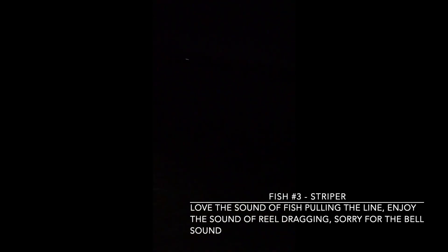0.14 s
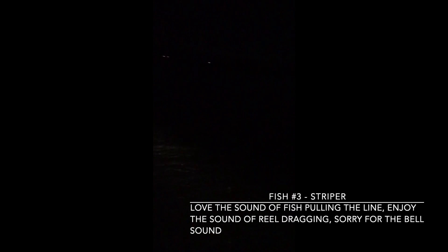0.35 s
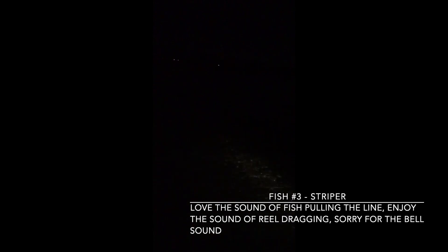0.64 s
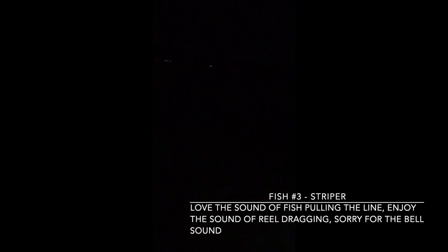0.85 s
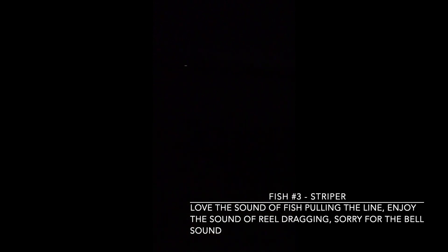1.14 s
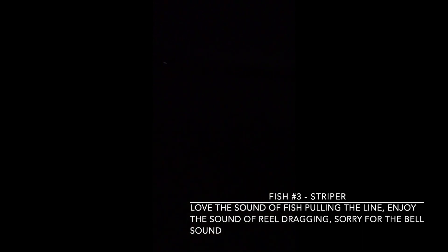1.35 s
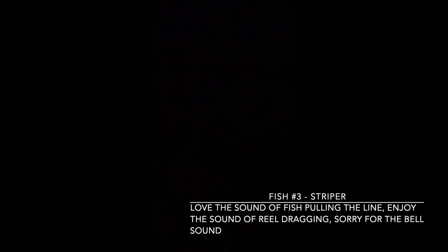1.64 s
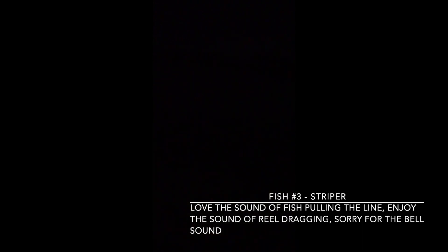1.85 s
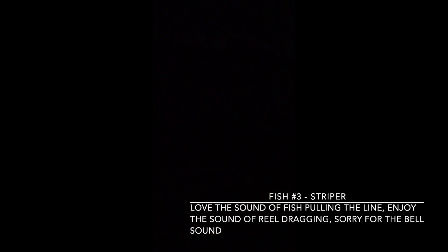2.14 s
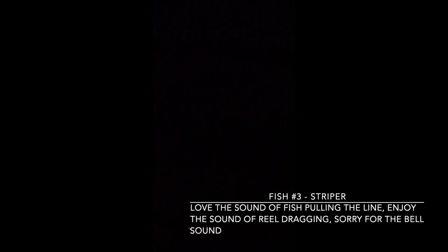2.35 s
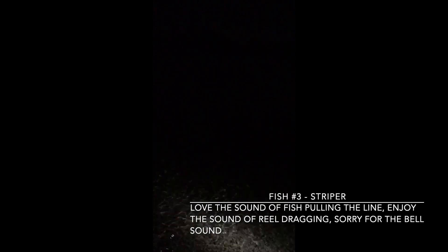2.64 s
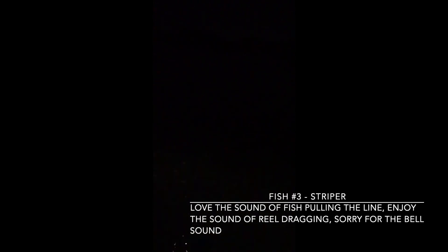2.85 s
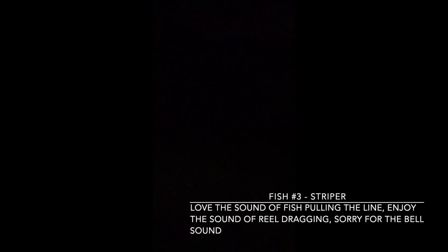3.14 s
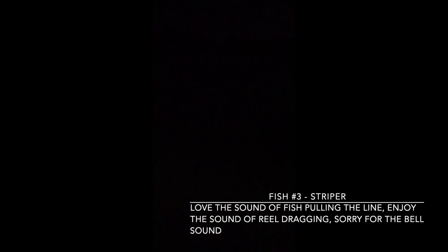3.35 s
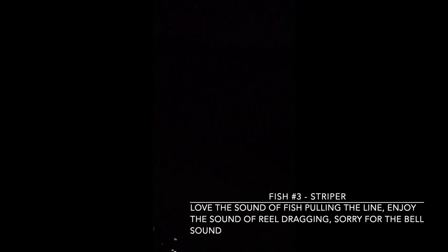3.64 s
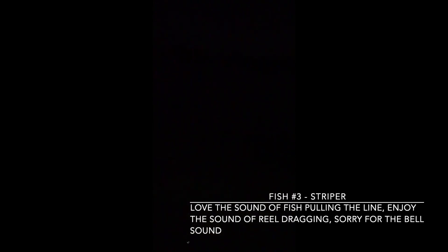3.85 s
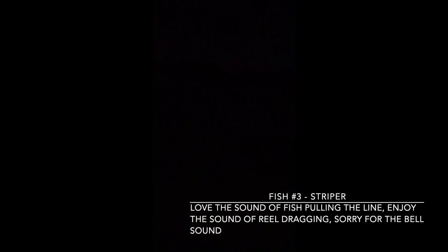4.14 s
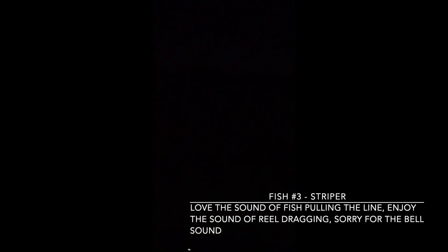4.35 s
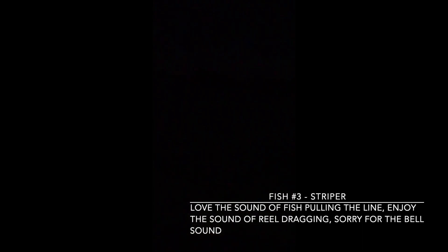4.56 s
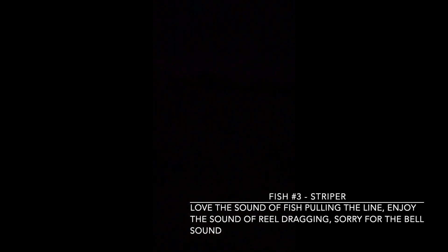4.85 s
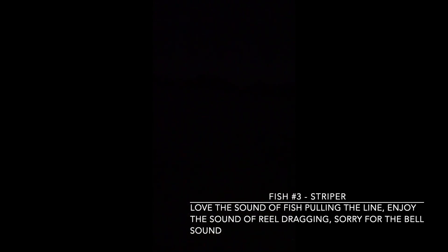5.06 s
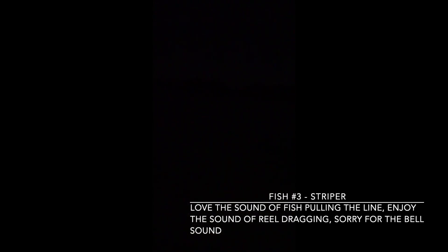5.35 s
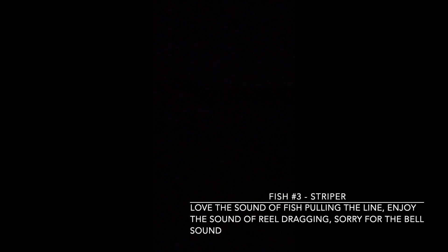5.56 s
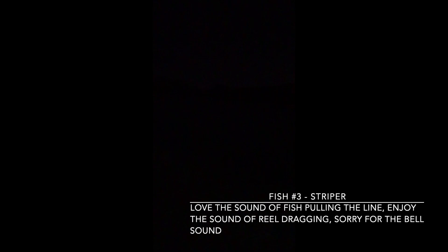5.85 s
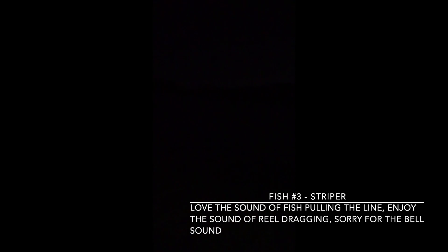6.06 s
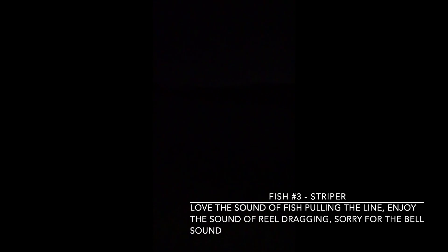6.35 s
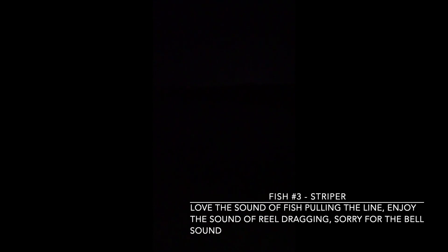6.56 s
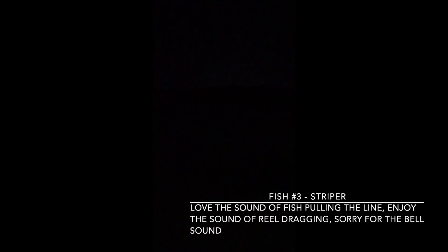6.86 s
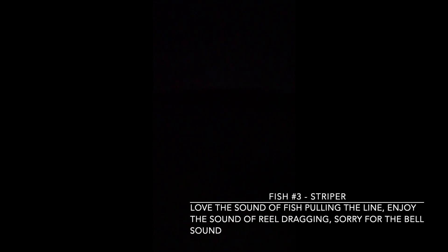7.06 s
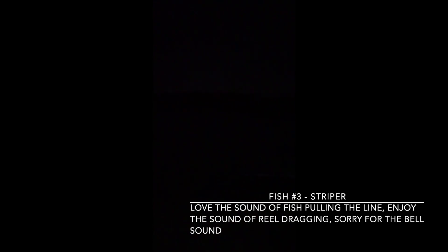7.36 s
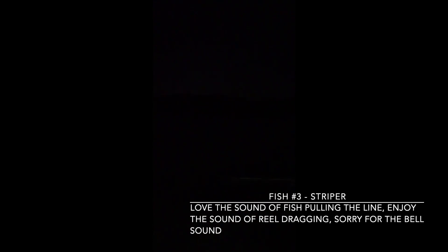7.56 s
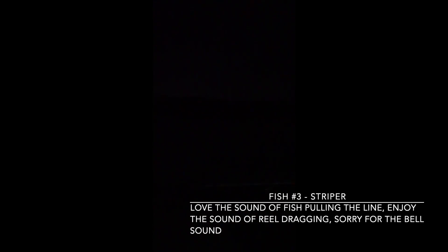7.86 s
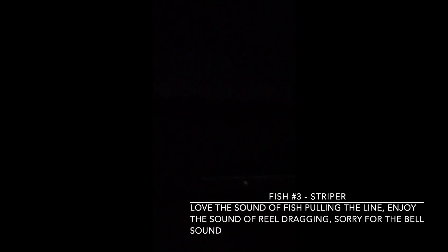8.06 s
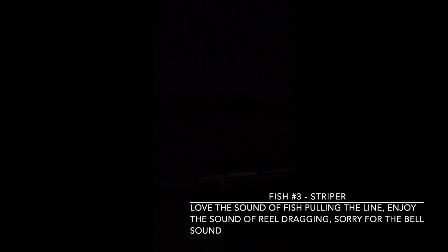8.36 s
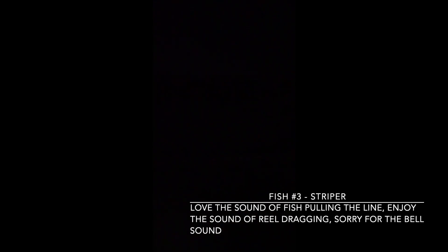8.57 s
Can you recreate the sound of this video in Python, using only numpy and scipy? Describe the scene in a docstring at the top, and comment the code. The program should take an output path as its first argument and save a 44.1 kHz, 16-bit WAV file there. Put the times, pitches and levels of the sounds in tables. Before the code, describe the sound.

Close up, a small pellet bell on a fishing rod jingles in quick irregular shakes, about eight a second, bright and metallic with very short ringing and dry clacks. Beneath it a reel ratchets softly and rapidly as line runs out. Early on there is one dull rod knock and a few tackle ticks. Small wavelets gurgle at the bank. Quiet open night air, faint distant rumble, no echo.

```python
"""Jingle bell on a fishing rod

A small bell clipped to the rod is shaken by a hooked fish, close by, on a quiet shore at night.
Its loose pellet strikes, rebounds and rolls, exciting decaying modes of the slit shell and dry clacks.
The reel ticks quickly as line runs: puffs of noise pass through its resonances. Tackle ticks; the rod knocks once.
Wavelets lap as swelling noise and gurgle as rising bubble tones, over night air and a faint, distant rumble.
"""
import sys
import numpy as np
from scipy import signal
from scipy.fft import rfft, irfft, next_fast_len
from scipy.io import wavfile
from scipy.ndimage import uniform_filter1d

SR = 44100
rng = np.random.default_rng(int(sys.argv[2]) if len(sys.argv) > 2 else 0)


def to_wav(sig):
    """Store sig (one row per channel, or 1-D mono) as 16-bit WAV at the path in sys.argv[1].

    Samples outside -1..1 are clipped; the rate is SR.
    """
    pcm = np.clip(np.atleast_2d(sig), -1, 1) * 32767
    pcm = np.round(pcm).astype(np.int16)
    wavfile.write(sys.argv[1], SR, pcm.T)  # frames by channels


N = 383669
TIME = np.arange(N) / SR

# Pellet strikes and where on the shell they land (mostly within -1 to 1).
# start_s, strength_db (relative), across (no unit), up (no unit)
STRIKES = [(0.0503, -20, -0.049, -0.097), (0.1425, -29.5, -0.47, 0.81), (0.1988, -26.5, 0.39, -0.26),
           (0.39, -30, -0.5, -0.03), (0.4642, -24.5, -0.43, -0.37), (0.5515, -29.5, 0.12, -0.22),
           (0.627, -25, 0.17, 0.3), (0.7406, -26.5, -0.33, 0.092), (0.8289, -22.5, 0.1, -0.42),
           (0.9237, -25.5, -0.021, 0.2), (0.9876, -26.5, 0.3, -0.33), (1.1698, -25.5, -0.4, 0.025),
           (1.2607, -19, 0.24, -0.28), (1.4227, -25.5, 0.11, 0.6), (1.6111, -24.5, -0.9, -0.35),
           (1.685, -24, -0.9, -0.39), (1.8153, -35, -0.59, 0.058), (1.918, -35, -0.4, 0.45),
           (2.0057, -26.5, -0.81, -0.045), (2.3506, -34.5, -1.95, -0.66), (2.593, -25, -0.36, -0.24),
           (2.6705, -22.5, -1.2, -0.34), (2.7377, -20, 0.24, 0.19), (2.8242, -28, -0.1, -0.5),
           (2.8596, -20, 0.078, -0.44), (2.9366, -27, -0.82, -0.11), (3.0869, -16.5, -0.3, -0.073),
           (3.2494, -21.5, 0.12, -0.6), (3.3414, -23.5, -1.5, 0.19), (3.4301, -24.5, -0.8, -0.84),
           (3.5532, -21.5, -0.3, -0.45), (3.6041, -16.5, -0.6, -0.99), (3.6591, -29, 0.9, -0.49),
           (3.7386, -22, 0.44, 0.27), (3.7652, -22, -0.4, -0.85), (3.8708, -32, -0.085, 1.13),
           (4.0214, -17.5, -0.078, -0.83), (4.139, -27.5, 0.2, -0.51), (4.1716, -22.5, 0.47, -0.42),
           (4.3166, -31.5, 0.077, 0.0092), (4.4119, -17, 0.44, -0.2), (4.5805, -29.5, 0.54, -0.09),
           (4.6863, -29.5, -0.084, 1.23), (4.7875, -22.5, 0.46, -0.65), (4.936, -25.5, 0.28, -0.33),
           (5.0892, -24.5, 0.0031, -0.13), (5.167, -18.0, 0.082, -0.44), (5.2879, -21, 0.55, 0.38),
           (5.3209, -19.0, 0.019, -0.42), (5.463, -24.5, 0.38, 0.25), (5.549, -17.5, 0.26, 0.35),
           (5.69, -26.5, 0.65, -0.6), (5.8132, -30.5, -0.14, 0.74), (5.9416, -24, 0.43, 0.2),
           (6.0865, -27.5, -0.49, 0.2), (6.3017, -19, 0.29, -0.32), (6.4208, -23.5, 0.23, -0.75),
           (6.55, -28.5, 0.41, 0.25), (6.636, -17, 0.24, -0.33), (6.6895, -29, 0.84, -0.12),
           (6.7379, -18, 0.27, 0.4), (6.8433, -38.5, -1.2, 0.3), (6.9318, -26, 0.4, -0.024),
           (7.1134, -24.5, 0.87, -0.59), (7.1964, -22, 0.31, 0.32), (7.2979, -20, 0.43, -0.48),
           (7.4175, -21, -0.26, 0.68), (7.4949, -17.5, 0.27, -0.095), (7.6694, -22, 0.18, 0.2),
           (7.7245, -35, -1.3, 0.0), (7.7857, -14.5, 0.13, -0.6), (7.9447, -22.5, -0.12, -0.28),
           (8.1936, -15.0, -0.3, -0.23), (8.3449, -26, 0.59, -1.16), (8.5026, -31.5, -0.86, 0.26),
           (8.6098, -15.5, -0.3, -0.64)]
# How strongly each family of shell modes answers to the place of a strike.
# gain_db (relative to the strength), across_db (per unit across), up_db (per unit up)
PLACE_RESPONSE = { "shimmer": (0.44, -1, -4), "hum": (-36, -4.5, 8.2), "low": (-27.5, -2.4, 0.1),
                  "main": (-18.5, -3.5, 4.1), "7 kHz": (-29.5, 15, -10), "8 kHz": (-22.5, -6, -5.5),
                  "10 kHz": (-21.5, 17, 6.8), }
# Modes of the shell by family: pitch_hz, level_db (relative), t60_s (typical)
SHELL_MODES = { "shimmer": [(6950, -30.5, 0.12), (8910, -22.5, 0.065), (12470, -20.5, 0.09),
               (13850, -25.5, 0.1), (13850, -30.5, 0.049), (15190, -29, 0.062)],
               "hum": [(1962.8, 4.5, 0.52)], "low": [(3392, -2, .36), (3898, 4, .18)],
               "main": [(4317, -12.5, 0.098), (4528, 7.5, 0.096)], "7 kHz": [(7300, 5, 0.23)],
               "8 kHz": [(8055, 5, 0.084)], "10 kHz": [(9635, 5, 0.14)], }
# Resonances of the dry clack: centre_hz, width_hz, level_db (relative)
CLACK_RESONANCES = [(4110, 3000, -2), (8380, 1200, -20), (8370, 1200, 7.5), (9330, 770, 1.5),
                    (11840, 3900, -6)]


def bell(count=6, gap_s=0.0085, rebound_db=-7, clack_db=-7):
    """Modal excitation: strikes and rebounds drive each mode by where they land, and clack on the shell."""
    s, strength_db, across, up = np.transpose(STRIKES)
    shape = (len(s), count)
    rebound_times = s[:, None] + np.cumsum(gap_s * rng.gamma(2, 0.5, shape), axis=1)
    drive_db = {}
    for family, (gain_db, across_db, up_db) in PLACE_RESPONSE.items():
        drive_db[family] = strength_db + gain_db + across_db * across + up_db * up
    ringing = np.zeros(N)
    for family, modes in SHELL_MODES.items():
        for hz, level_db, t60 in modes:
            ringing += shell_mode(s, drive_db[family] + level_db, rebound_times, hz, t60)

    # the clack follows the shimmer: a sharp tick, then a faint scrape as the pellet slides
    blow = amp(drive_db["shimmer"] + clack_db)
    rebounds = blow[:, None] * amp(rebound_db) * rng.random(shape)
    contacts = pulses(s, blow) + pulses(rebound_times, rebounds)
    tick = bursts(contacts, decay_s=0.001)
    scrape = amp(-19) * bursts(contacts, decay_s=0.012)
    clack = body(tick + scrape, CLACK_RESONANCES)

    # so small a shell radiates no bass
    no_bass = signal.butter(4, 1600, "high", fs=SR, output="sos")
    return signal.sosfilt(no_bass, ringing + clack + rolling())


# Shortly after a strike the pellet rests on the shell; the choke rate is that of modes above 5.5 kHz
SETTLE_S, CHOKE_DB_PER_S = 0.071, 126
# Chance differences of level between strikes, drawn for each mode
STRIKE_SCATTER_DB = 1.3


def shell_mode(s, strike_db, rebound_times, hz, t60, grip=0.14, jolt=0.42):
    """Damped vibration: a strike adds to what still rings; the pellet on the shell detunes and damps it."""
    detune, step_db, rise_s = 0.002, 3, 0.0004
    # the pellet disturbs high modes most, the hum hardly at all
    touch = min(hz / 5500, 1) ** 2
    shift, damping, scatter = rng.standard_normal((len(s), 3)).T
    strike_db = strike_db + STRIKE_SCATTER_DB * scatter

    # index of the latest strike at every sample, and the time since it
    last = np.maximum(np.cumsum(pulses(s, np.ones(len(s)))).astype(int) - 1, 0)
    age = np.maximum(TIME - s[last], 0)
    # the energy left from the strike before adds to the new one
    still_ringing = amp(strike_db[:-1]) * np.exp(-np.log(1000) * np.diff(s) / t60)
    size = np.hypot(amp(strike_db), np.r_[0, still_ringing])

    # each rebound meets the vibration at a chance moment: it feeds or checks it and jolts its phase
    push = rebound_steps(rebound_times, touch)
    turn = rebound_steps(rebound_times, touch)
    push_at_strike = push[(s * SR).astype(int)][last]
    push = np.clip(push - push_at_strike, -4, 1)
    strike_hz = hz * (1 + detune * np.sqrt(touch) * shift)
    phase = 2 * np.pi * strike_hz[last] * age + jolt * turn

    strike_t60 = t60 * np.exp(grip * touch * damping)
    decay = np.exp(-np.log(1000) * age / strike_t60[last])
    choke_db = CHOKE_DB_PER_S * touch * np.maximum(age - SETTLE_S, 0)
    rise = 1 - np.exp(-age / rise_s)
    return size[last] * amp(step_db * push - choke_db) * rise * decay * np.sin(phase)


def rebound_steps(times, touch):
    """Random walk: every rebound adds a chance step, smoothed over 24 samples."""
    steps = pulses(times, touch * rng.standard_normal(times.shape))
    return uniform_filter1d(np.cumsum(steps), size=24)


# Level of the running reel, which also drives the rolling: start_s, level_db
REEL_LEVEL = [(0, -59), (1.0, -67), (1.5, -63), (2.05, -69.5), (2.25, -69.5), (2.52, -81), (2.75, -59),
              (3.8, -62), (4.3, -61), (5.05, -62.5), (5.27, -55.5), (5.6, -59.5), (6.9, -62), (7.1, -58),
              (8.7, -57.5)]


def rolling(count=80, level_db=7.0, scatter_db=4):
    """Impulse response: the running line shivers the rod and the pellet brushes the shell at random."""
    times = rng.random(count) * N / SR
    modes = [mode for family in ("main", "8 kHz", "10 kHz", "7 kHz") for mode in SHELL_MODES[family]]
    shiver = amp(curve(REEL_LEVEL) + level_db)
    out = np.zeros(N)
    for hz, _, t60 in modes:
        brushes = pulses(times, amp(scatter_db * rng.standard_normal(count)))
        out += ring(shiver * brushes, hz, t60 / 2)
    return out


# Resonances of the reel body: centre_hz, width_hz, level_db (relative)
REEL_BODY = [(2870, 240, 1), (4130, 340, 3.5), (4680, 210, 2.5), (6340, 1570, -0.5), (8160, 3600, -5),
             (12500, 1400, -6)]
# Pawl: typical click rate, scatter and decay of the clicks; surge scatter before smoothing over teeth
CLICK_HZ, CLICK_SCATTER_DB, CLICK_S, SURGE_DB = 110, 3.8, 0.003, 5


def reel(uneven=0.3, whirr_db=-13, count=2000):
    """Ratchet and resonance: the pawl skips over the spool's teeth; the gears whirr softly between clicks."""
    gap, size, pull = rng.standard_normal((count, 3)).T
    times = np.cumsum(np.exp(uneven * gap)) / CLICK_HZ
    # the pull on the line comes in surges that last several teeth
    surge_db = SURGE_DB * uniform_filter1d(pull, size=9)
    clicks = bursts(pulses(times, amp(CLICK_SCATTER_DB * size + surge_db)), CLICK_S)
    whirr = amp(whirr_db) * rng.standard_normal(N)
    return unit(body(clicks + whirr, REEL_BODY)) * amp(curve(REEL_LEVEL))


# Single sharp ticks of line and tackle: start_s, level_db (relative)
TICKS = [(1.506, -30), (1.8547, -33), (1.8879, -27.5), (2.1484, -35), (2.4705, -34.5), (2.5013, -35),
         (4.0036, -26)]


def tackle(level_db=1):
    """Stick and slip: taut line slips and ticks against the reel, each tick a short filtered burst."""
    s, db = np.transpose(TICKS)
    ticks = bursts(pulses(s, amp(db + level_db)), decay_s=0.001)
    return body(ticks, [(4540, 2300, -4.5), (7900, 2700, -5.0)])


def knock(s=1.056, level_db=-31):
    """Impact: one dry knock on the rod, a noise burst in broad resonances with one short mode."""
    hit = pulses([s], [amp(level_db)])
    thud = body(bursts(hit, decay_s=0.0024), [(1310, 1200, 6.5), (2640, 1500, 8.0), (5860, 5600, -12)])
    return thud + amp(-21) * ring(hit, hz=908, t60=0.066)


# Wavelets lapping at the bank; pitch is the middle one of their bubbles.
# crest_s, level_db (relative), half_length_s, pitch_hz
WAVELETS = [(0.297, -60.5, 0.14, 1456), (0.389, -53.5, 0.031, 987), (1.695, -60.5, 0.045, 1235),
            (1.94, -62.5, 0.22, 1247), (2.211, -60.5, 0.057, 895), (2.802, -65, 0.11, 1184),
            (3.246, -62.5, 0.073, 1416), (3.61, -60.5, 0.11, 1084), (3.802, -56, 0.068, 938),
            (4.153, -63.5, 0.2, 1365), (5.254, -58, 0.1, 1314), (5.519, -60.5, 0.21, 1400),
            (6.862, -57.5, 0.02, 1420), (7.024, -56, 0.04, 857)]
# The few large bubbles that plop on their own: start_s, level_db (relative), pitch_hz (at the start)
BUBBLES = [(0.271, -35, 1560), (1.666, -39, 1166), (2.005, -35.5, 960), (3.301, -41.5, 1580),
           (3.574, -49, 317), (5.591, -42, 1210), (6.843, -42.5, 303), (6.997, -49, 342)]
# Colour of breaking water: frequency_hz, density_db (per Hz, relative)
WASH_COLOUR = [(200, -36), (350, 1), (600, -12.5), (1100, -0.5), (1700, -2.5), (2800, 0.5), (5000, -14),
               (15000, -18)]


def water(wash_db=-5, clear_db=-1, calm_db=-76):
    """Turbulence and bubble resonance: wavelets break into a soft wash and gurgle; large bubbles plop."""
    out = drips()
    for s, db, length, hz in WAVELETS:
        out += amp(db) * gurgle(s, length, hz)
    for s, db, hz in BUBBLES:
        add(out, s, amp(db + clear_db) * bubble(hz, cycles=8.5, glide=0.047))
    return out + swells(WAVELETS, calm_db) * amp(wash_db) * noise(WASH_COLOUR)


# Bubbles of a wavelet: their number per s of half length, and how pitch climbs and spreads (in e-folds)
GURGLE_PER_S, GURGLE_RISE, GURGLE_SPREAD = 460, 0.183, 0.33
# Each of them: level relative to the wavelet, cycles to fall to 1/e, fractional rise in that time
GURGLE_DB, GURGLE_CYCLES, GURGLE_GLIDE = 5, 6.4, 0.098


def gurgle(crest_s, length_s, middle_hz, most=60, scatter_db=3):
    """Bubble resonance: large ones tend to come first, then smaller, higher ones as the hollow closes."""
    out = np.zeros(N)
    count = min(most, int(GURGLE_PER_S * length_s))
    for when, pitch, size in rng.standard_normal((count, 3)):
        hz = middle_hz * np.exp(GURGLE_RISE * when + GURGLE_SPREAD * pitch)
        level = amp(GURGLE_DB + scatter_db * size)
        start_s = crest_s + length_s * when / np.sqrt(2)
        add(out, start_s, level * bubble(hz, GURGLE_CYCLES, GURGLE_GLIDE))
    return out


def drips(count=420, level_db=-62, scatter_db=3):
    """Bubble resonance: small bubbles are scattered at random times all along the bank."""
    centre_hz, spread = 1600, 0.32
    out = np.zeros(N)
    for s, (pitch, size) in zip(rng.random(count) * N / SR, rng.standard_normal((count, 2))):
        hz = centre_hz * np.exp(spread * pitch)
        add(out, s, amp(level_db + scatter_db * size) * bubble(hz, cycles=10, glide=0.08))
    return out


def bubble(hz, cycles, glide):
    """Volume resonance: a damped tone that rises as the bubble nears the surface."""
    # age 1 is the time of the given cycles, when the tone has fallen to 1/e
    age = np.arange(int(4 * cycles * SR / hz)) * hz / (cycles * SR)
    tone = np.sin(2 * np.pi * cycles * age * (1 + glide * age / 2))
    return tone * np.exp(-age) * (1 - np.exp(-age * cycles))


# Colour of the night air: frequency_hz, density_db (per Hz, relative)
NIGHT_COLOUR = [(20, -29), (32, 1), (45, -5.5), (75, 4.5), (110, 1), (200, -3.5), (300, -6.5), (450, -14),
                (900, -16.5), (2500, -14.5), (8000, -34.5), (16000, -32)]
# Swells of the distant rumble: crest_s, level_db (relative), half_length_s
RUMBLE_SWELLS = [(.45, -60.5, 0.38), (1.85, -58.5, 0.29)]
# Colour of the rumble: frequency_hz, density_db (per Hz, relative)
RUMBLE_COLOUR = [(22, -25), (45, -2), (100, -6), (170, 6), (250, -9.5), (400, -15.5), (1200, -51)]


def night(air_db=-64, rumble_db=-3, rest_db=-74.5):
    """Broadband ambience: coloured noise for still air, and for a low rumble that swells now and then."""
    air = amp(air_db) * noise(NIGHT_COLOUR)
    return air + swells(RUMBLE_SWELLS, rest_db) * amp(rumble_db) * noise(RUMBLE_COLOUR)


def swells(rows, rest_db):
    """Amplitude envelope: bell-shaped swells rise from a resting level."""
    out = np.full(N, amp(rest_db))
    for s, db, length, *_ in rows:
        out += amp(db) * np.exp(-((TIME - s) / length) ** 2)
    return out


def amp(db):
    """Logarithmic level: decibels to gain."""
    return 10 ** (np.asarray(db) / 20)


def unit(x):
    """Normalisation: scale to rms 1."""
    return x / np.sqrt(np.mean(x ** 2))


def curve(rows):
    """Linear interpolation: join (s, value) rows by straight lines."""
    return np.interp(TIME, *np.transpose(rows))


def add(out, s, sound):
    """Superposition: mix a sound in at a time in seconds."""
    i = int(np.clip(s * SR, 0, N))
    out[i:i + len(sound)] += sound[:N - i]


def pulses(times, sizes):
    """Impulse train: one single-sample impulse at each time."""
    index = np.clip(np.ravel(times) * SR, 0, N).astype(int)
    return np.bincount(index, np.ravel(sizes), N + 1)[:N]


def ring(x, hz, t60):
    """Damped resonator: one decaying mode; a unit impulse rings at amplitude 1."""
    r = np.exp(-np.log(1000) / (t60 * SR))
    w = 2 * np.pi * hz / SR
    # the tiny offset keeps the filter clear of denormal numbers
    return signal.lfilter([0, np.sin(w)], [1, -2 * r * np.cos(w), r * r], x + 1e-18)


def body(x, resonances):
    """Parallel resonators: broad peaks side by side, each applied twice for steep skirts."""
    out = np.zeros(N)
    for hz, width, db in resonances:
        peak = np.concatenate(signal.iirpeak(hz, hz / width, SR))
        out += amp(db) * signal.sosfilt([peak] * 2, x + 1e-18)
    return out


def bursts(hits, decay_s):
    """Exponential decay: every impulse becomes a dying puff of noise."""
    envelope = signal.lfilter([1], [1, -np.exp(-1 / (decay_s * SR))], hits + 1e-18)
    return envelope * rng.standard_normal(N)


def noise(spectrum):
    """Spectral shaping: noise of rms 1 with a given colour."""
    hz, db = np.transpose(spectrum)
    size = next_fast_len(N, True)
    bins = np.fft.rfftfreq(size, 1 / SR)
    gain = amp(np.interp(np.log(bins + 1), np.log(hz), db))
    return unit(irfft(rfft(rng.standard_normal(size)) * gain, size)[:N])


def scene():
    """Superposition: rod and reel close by, the water below, open air without echo."""
    return (bell() + reel() + tackle() + knock() + water() + night())[None]


def record(dry, top_hz=16300):
    """Band limitation: a steep low-pass filter cuts the top."""
    return signal.sosfilt(signal.ellip(8, 0.2, 70, top_hz, fs=SR, output="sos"), dry)


dry = scene()
out = record(dry)
to_wav(out)
```